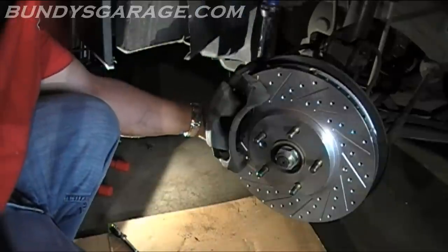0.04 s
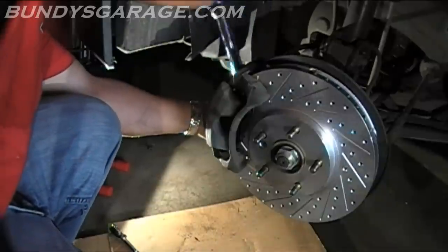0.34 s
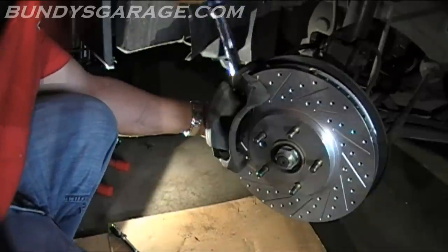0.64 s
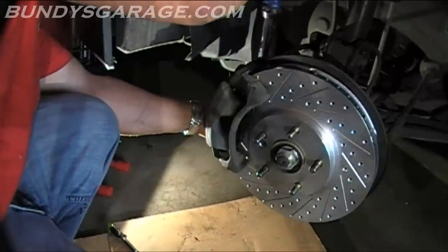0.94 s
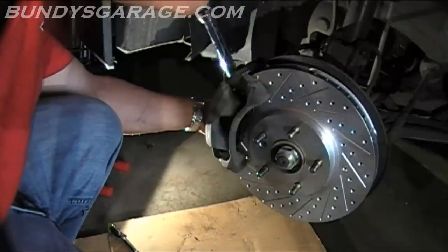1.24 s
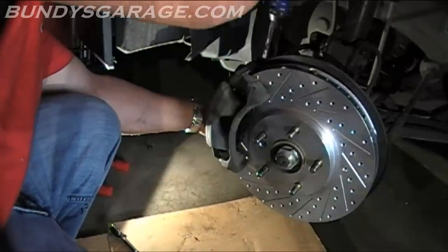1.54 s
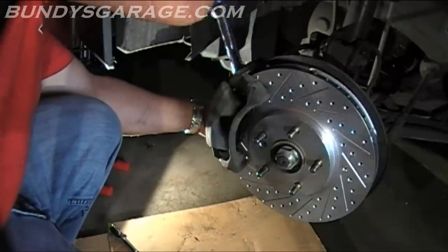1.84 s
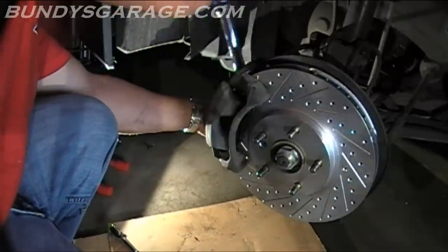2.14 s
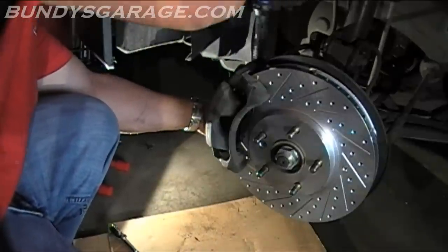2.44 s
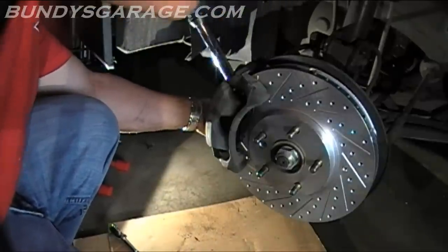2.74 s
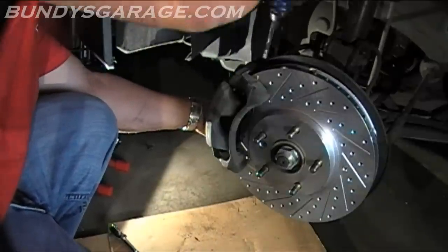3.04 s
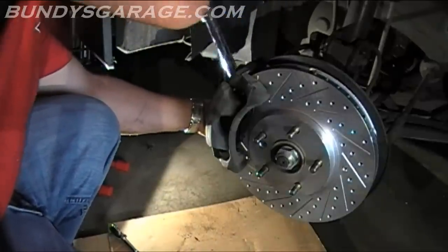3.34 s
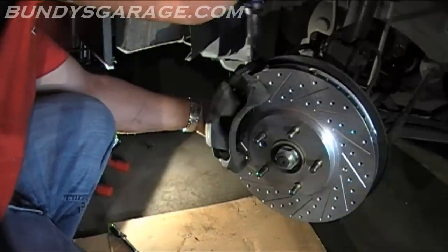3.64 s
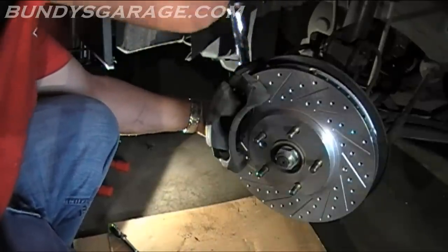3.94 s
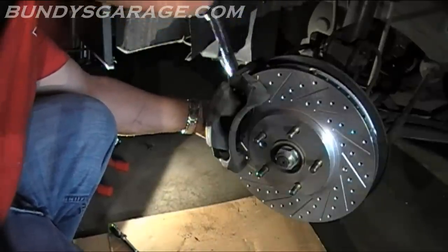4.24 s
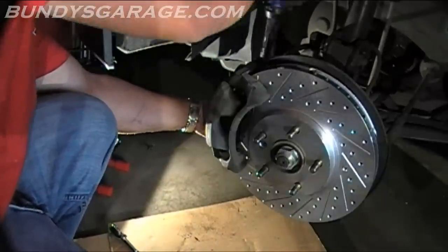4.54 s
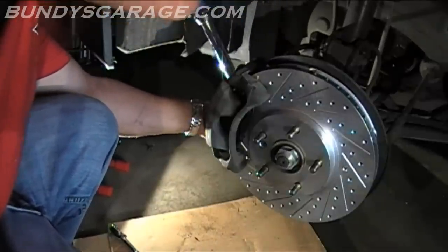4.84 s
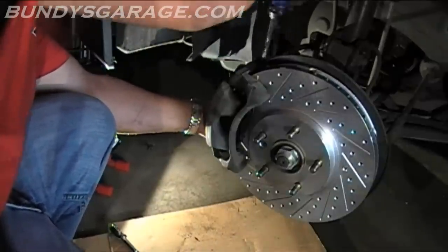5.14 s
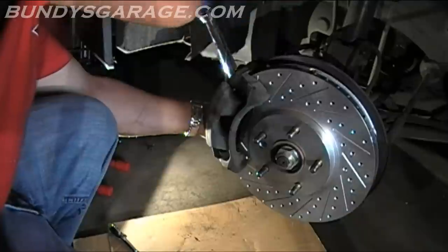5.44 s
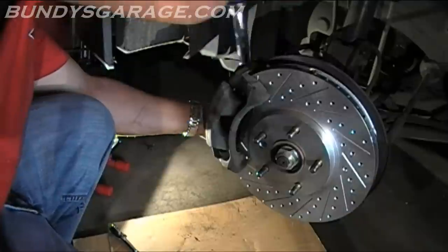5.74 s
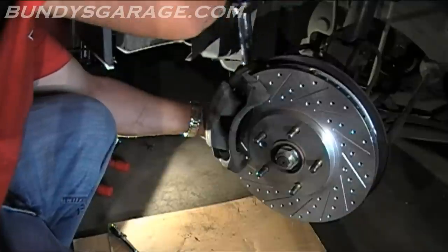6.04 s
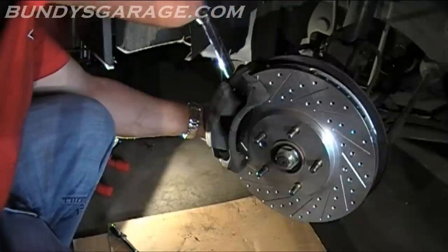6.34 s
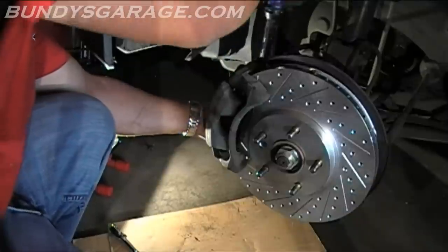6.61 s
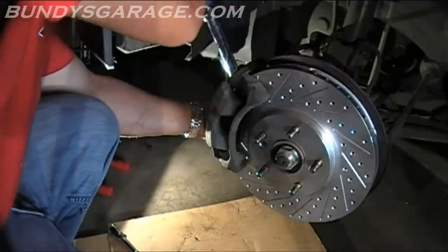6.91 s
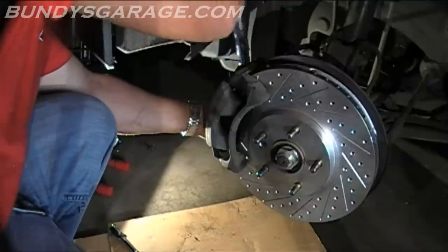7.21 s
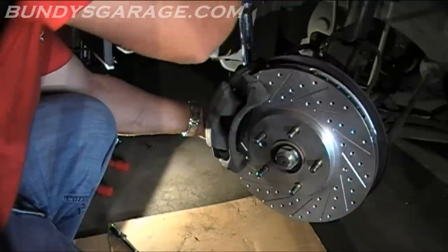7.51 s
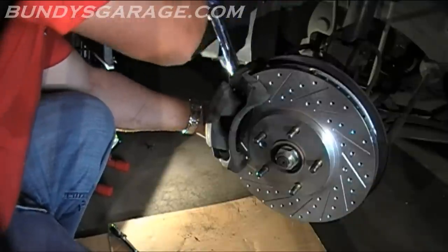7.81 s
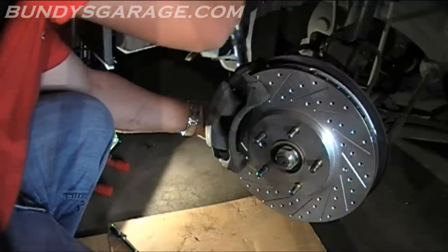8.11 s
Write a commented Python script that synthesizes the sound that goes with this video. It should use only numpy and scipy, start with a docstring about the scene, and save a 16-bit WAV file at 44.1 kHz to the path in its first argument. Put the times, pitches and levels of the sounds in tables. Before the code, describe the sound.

Close, short runs of ratchet clicks alternate with metallic knocks and hard clunks as a wrench tightens a brake bolt.

```python
"""A click-type torque wrench tightens a brake caliper bolt in a garage, close to a camera.
On each back swing the pawl skips a few teeth, then the head knocks as it takes up its slack.
From about 2 s the steel creeps under load and the wrench breaks over with clunks that ring the hub.
Near 3 s the bolt seats and the ticks grow fuller; after 7 s two tinks sound as the grip is reset.
Light taps and sleeve brushes come in between, over room air and the camera's faint whine."""
import sys
import numpy as np
from scipy import signal
from scipy.fft import rfft, irfft
from scipy.io import wavfile
from scipy.ndimage import uniform_filter1d

SR = 44100
rng = np.random.default_rng(int(sys.argv[2]) if len(sys.argv) > 2 else 0)


def pcm_store(signal):
    """Save signal as 16-bit PCM."""
    levels = np.round(np.clip(np.atleast_2d(signal), -1, 1) * 32767)
    wavfile.write(sys.argv[1], SR, levels.astype(np.int16).T)


N = 360297

# Socket resonances. Each row: frequency in Hz, width in Hz, lift in dB.
SOCKET_RESONANCES = [(345.3, 25, 7), (388.4, 15, 5.7), (761.5, 34, 14), (879, 28, 11), (1064, 21, 7),
                     (1137, 30, 7), (1275, 50, 2.2), (1300, 140, 3.2), (1860, 70, 2.1), (1790, 24, 2.5),
                     (2674, 25, 5.4), (2508, 31, 5.2), (3240, 380, 4), (3550, 29, 4.7), (4460, 28, 2),
                     (5460, 100, 11), (5730, 66, 5.4), (8000, 120, 6.3), (9100, 110, 4.6)]
# Spectrum of taps and creep. Each row: frequency in Hz, gain in dB.
CONTACT_SPECTRUM = [(150, -15.5), (400, 1), (800, -5.5), (1600, -2), (3500, -8), (6000, -9), (9000, -9.5),
                    (12000, -25.5), (16000, -38)]


def clunks():
    """The wrench breaks over under full load and snaps back, ringing the hub."""
    # Each row: start in seconds, level, bass, middle and treble in dB, T60 in seconds, pitch in Hz.
    events = [(2.0677, 10.5, -13, -2, 3.5, 0.066, 790), (2.0798, 16, -1, 4, -4, 0.056, 330),
              (2.154, 0.4, -1.5, 5.5, 4.5, 0.034, 740), (2.7925, 25.5, -9, 5.5, -5.5, 0.038, 646),
              (4.9633, 2.4, -1, 1, 1, .033, 427), (5.6003, 23.5, -6.5, 0, -3.5, 0.042, 406),
              (5.6095, 1.5, -0.5, 20.5, -23, .042, 1530), (5.6957, 6.5, -8, 0, 3, 0.035, 1500)]
    # Each row: frequency in Hz, gain in dB.
    spectrum = [(25, -45.5), (50, -40), (140, -18.5), (270, -14), (350, -6.5), (520, 6.5), (750, 3.5),
                (1100, -2.5), (1500, -5.5), (2400, -10.5), (3700, -6), (5200, -17), (8500, -15.5),
                (12500, -34), (16000, -46)]
    # Each row: resonance in Hz, width in Hz, lift in dB.
    hub = [(150, 16, 21), (202, 16, 14), (328, 34, 16), (447, 30, 8.9), (465, 24, 8.4), (567.4, 42, 11),
           (742, 38.2, 7.8), (780, 8.7, 2.2), (824, 43, 6.8), (1310, 55, 4.7), (1450, 110, 6.4),
           (1640, 35, 8.3), (2054, 48, 3.4), (2750, 60, 6), (3000, 91, 7), (3470, 110, 5.1), (3860, 190, 8)]
    rows = [(s, db, t60_s, hz, contact_curve(s, bass_db, middle_db, treble_db, hz, 150, lift_db=5.5))
            for s, db, bass_db, middle_db, treble_db, t60_s, hz in events]
    return blows(rows, spectrum, hub, rise_s=.00043, scatter_db=-1, scatter_t60_s=.12, ring_db=-15)


def knocks(soft_bass_db=7.5, bass_db_per_db=-.35, middle_db=-.65):
    """Head and socket take up their slack; a harder knock is a shorter contact with less bass."""
    # Each row: start in seconds, level in dB, treble in dB, T60 in seconds, pitch in Hz.
    events = [(1.654, 10.5, 1, 0.024, 538), (2.4176, 9, 10, 0.014, 5810), (3.1426, 16, 5.5, 0.057, 4370),
              (3.8357, 15.5, -1, 0.017, 3450), (4.554, 13, .5, 0.021, 3300), (5.2679, 14.5, 5, 0.053, 1305),
              (5.9545, 20, 7, 0.029, 353), (6.835, -2, 2, 0.014, 288), (7.465, 13.5, 3, 0.019, 2570),
              (7.5979, 3, 6, 0.016, 357)]
    # Each row: frequency in Hz, gain in dB.
    spectrum = [(90, -35.5), (220, -24.5), (350, -11), (550, -13), (800, -8.5), (1050, -3), (1350, -0.5),
                (2200, -7), (3500, -5), (5200, -10.5), (6600, -15.5), (8500, -6.5), (11000, -22.5),
                (16000, -50)]
    rows = []
    for s, db, treble_db, t60_s, hz in events:
        bass_db = soft_bass_db + bass_db_per_db * db
        contact = contact_curve(s, bass_db, middle_db, treble_db, hz, width_hz=.17 * hz, lift_db=2.5)
        rows.append((s, db, t60_s, hz, contact))
    return blows(rows, spectrum, SOCKET_RESONANCES,
                 rise_s=.0006, scatter_db=-6, scatter_t60_s=.088, ring_db=-12)


def pawl(t60_s=.023, seated_bass_db=.5, loose_bass_db=-9.5, treble_db=1.2):
    """The pawl drops over ratchet teeth: bright ticks, thinner until the bolt seats."""
    # Each row: start in seconds, level in dB, middle in dB, pitch in Hz.
    events = [(0.0447, 2, -3.5, 4950), (0.1772, 1.5, -1, 10600), (.76, 3, 1, 1680), (0.8007, 1, -2, 1690),
              (0.8515, 2.5, -4, 1870), (0.9214, 1, -8.5, 3630), (1.5133, 3.5, -7, 3020),
              (1.578, 0.5, -4, 5600), (2.2825, .5, 2.5, 12200), (2.3357, 1.5, 2, 12400),
              (3.0138, -1, -0.5, 8200), (3.0623, -7.5, -1, 4040), (3.069, -1.5, -2, 8800),
              (3.7151, 2, -4, 7000), (3.7705, -3, 1.5, 7200), (3.8512, -3.5, -8, 9000),
              (4.4207, -2, -5.5, 2820), (4.4829, -1, -4, 4140), (5.1564, -3, -2.5, 3000),
              (5.205, -7.5, 2, 3740), (5.2133, -2, -1, 8000), (5.8518, 0, -6, 8960), (5.909, -3, -4, 7400),
              (5.9945, -3, 6, 8250), (6.5518, -0.5, -1, 5500), (6.6125, -2, 1.5, 7200),
              (7.359, 1, -6.5, 3660), (7.4274, 1, 1, 8860)]
    # Each row: frequency in Hz, gain in dB.
    spectrum = [(150, -29), (500, -10.5), (1000, -8), (1700, -2), (2400, -6), (3200, -1), (4000, -1.5),
                (5000, -4.5), (6500, -1.5), (8200, 3), (10000, -4.5), (12500, -13.5), (14500, -27),
                (16500, -31.5)]
    # Each row: resonance in Hz, width in Hz, lift in dB.
    ratchet = [(1850, 420, 6.5), (3020, 140, 8.5), (3776, 390, 9.5), (4985, 150, 11), (5670, 190, 9),
               (7350, 350, 3), (7830, 250, -10), (9300, 200, 10.5), (11940, 300, -11.5)]
    rows = []
    for s, db, middle_db, hz in events:
        bass_db = seated_bass_db + loose_bass_db * looseness(s)
        contact = contact_curve(s, bass_db, middle_db, treble_db, hz, width_hz=520, lift_db=5.5)
        rows.append((s, db, t60_s, hz, contact))
    return blows(rows, spectrum, ratchet, rise_s=.0016, scatter_db=-14, scatter_t60_s=.11, ring_db=-8)


def blows(rows, spectrum, body, rise_s, scatter_db, scatter_t60_s, ring_db, sing_db=9.5, sing_oct=.055):
    """Steel on steel: a crack through the struck body, scatter in the wheel well, ringing modes."""
    # Faint modes of disc and handle. Each row: frequency in Hz, level in dB, T60 in seconds.
    steel_modes = [(285, -25, 1.1), (352, -24.5, 1.9), (531.7, -19, 0.53), (669, -20.5, 0.28),
                   (811, -16.5, 0.2), (1206, -23, 0.17), (1395, -23.5, 0.2), (1493, -19.5, 0.2),
                   (1779, -21.5, 0.34), (2980, -19.5, 0.053), (3720, -23.5, .14), (4900, -24, .19),
                   (5720, -23, .23), (8590, -20.5, 0.079)]
    mode_hz, mode_db, mode_t60_s = np.transpose(steel_modes)
    cracks, ringing = np.zeros((2, 2, N))
    t, ring_t = np.arange(4096) / SR, np.arange(SR) / SR
    modes = unit(np.sin(2 * np.pi * mode_hz[:, None] * ring_t) * amp(-60 * ring_t / mode_t60_s[:, None]))
    attack = 1 - np.exp(-(t / rise_s) ** 2)
    for s, db, t60_s, pitch_hz, contact in rows:
        decay = amp(-60 * t / t60_s) + amp(scatter_db - 60 * t / scatter_t60_s)
        add(cracks, s - rise_s / 2, amp(db) * colour(clatter(attack * decay), spectrum, contact))
        # Modes near the blow's pitch sing out; each landing wakes them in other shares.
        tuned_db = sing_db * np.exp(-(np.log2(mode_hz / pitch_hz) / sing_oct) ** 2)
        drive_db = db + ring_db + value_at(spectrum, mode_hz) + value_at(contact, mode_hz)
        spread_db = 2.8 * rng.standard_normal((2, len(mode_hz)))
        shares = amp(drive_db + mode_db + tuned_db + spread_db)
        add(ringing, s, (shares * rng.choice([-1, 1], shares.shape)) @ modes)
    return colour(cracks, resonance_curve(body), size=8192)[:, :N] + ringing


def clatter(envelope, rattle_db=1, lump_samples=30, smooth_bins=61):
    """Dense modes as enveloped noise, lumpy where the faces chatter; mid and side."""
    n = len(envelope)
    lumps = uniform_filter1d(rng.standard_normal(n), lump_samples) * np.sqrt(lump_samples)
    bins = rfft(rng.standard_normal((2, n)) * envelope * amp(rattle_db * lumps), 8192)
    bins /= np.sqrt(uniform_filter1d(abs(bins) ** 2, smooth_bins, axis=1, mode="mirror"))  # fill gaps
    return unit(irfft(bins)[:, :n])


def contact_curve(s, bass_db, middle_db, treble_db, pitch_hz, width_hz, lift_db, loose_sheen_db=4.5):
    """How a blow lands, as (Hz, dB): a broad tone plus a hump at its pitch."""
    hz = np.fft.rfftfreq(4096, 1 / SR)
    top_db = treble_db + loose_sheen_db * looseness(s)
    tone = [(150, 0), (450, bass_db), (1400, middle_db), (3800, 0), (8500, treble_db), (12000, top_db)]
    hump_db = lift_db / (1 + (2 * (hz - pitch_hz) / width_hz) ** 2)
    return np.transpose([hz, value_at(tone, hz) + hump_db])


def resonance_curve(body, smooth_bins=161):
    """A body's resonances as (Hz, dB), level on average."""
    hz = np.fft.rfftfreq(8192, 1 / SR)
    power = 1 + sum((amp(db) ** 2 - 1) / (1 + (2 * (hz - f) / width) ** 2) for f, width, db in body)
    power = np.maximum(power, .1)
    return np.transpose([hz, 10 * np.log10(power / uniform_filter1d(power, smooth_bins))])


def looseness(s, seated_s=2.9, seating_s=.25):
    """1 while the bolt turns freely, 0 once seated."""
    return .5 - .5 * np.tanh((s - seated_s) / seating_s)


def taps(t60_s=.069, hz=1100, bass_db=3, middle_db=1):
    """A faint, dull knock dies away at the very start; light steel taps follow."""
    # Each row: start in seconds, level in dB, treble in dB.
    events = [(.007, -11, -8), (1.3823, -22, 9.5), (1.829, -17, 6), (2.535, -17.5, -8), (3.267, -7, -6),
              (3.5555, -16, -5.5), (3.9425, -8.5, -3), (4.7116, -15.5, 11.5), (4.738, -11, -27),
              (4.8984, -8.5, -7), (5.4177, -8, -22), (5.5584, -2.5, -5.5), (6.086, -11.5, -17.5),
              (6.799, -17, -5), (7.062, -9, -6.5), (7.1337, -14.5, -6), (7.181, -10, 0), (7.222, -20, -9),
              (7.279, -18, -20)]
    rows = [(s, db, t60_s, hz, contact_curve(s, bass_db, middle_db, treble_db, hz, 200, lift_db=3))
            for s, db, treble_db in events]
    return blows(rows, CONTACT_SPECTRUM, SOCKET_RESONANCES,
                 rise_s=.00091, scatter_db=-17.5, scatter_t60_s=.68, ring_db=-6.5)


def tinks(hz=1010, t60_s=.028):
    """A loose steel part touches and rings on one damped mode; mid only."""
    # Each row: start in seconds, peak in dB.
    events = [(7.222, -43), (7.279, -42)]
    out, t = np.zeros((2, N)), np.arange(SR // 4) / SR
    for s, db in events:
        ring = amp(db - 60 * t / t60_s) * np.sin(2 * np.pi * hz * t)
        add(out[:1], s, ring[None])
    return out


def creep():
    """Steel creeps under load before it lets go."""
    # Each row: start in seconds, length in seconds, level in dB.
    events = [(2.035, 0.034, -2), (4.902, 0.081, -2.5), (4.98, 0.061, -10), (5.405, 0.049, -13.5),
              (5.56, 0.14, 0.5), (5.594, 0.011, 0), (5.73, 0.047, -5.5), (5.937, 0.016, -8),
              (7.18, 0.06, -14.5), (8.13, 0.054, -20)]
    return friction(events, CONTACT_SPECTRUM, grain_db=3.5, taper=.3)


def sleeve():
    """A sleeve brushes past as the arm swings."""
    # Each row: start in seconds, length in seconds, level in dB.
    events = [(.33, 0.23, -9.5), (1.05, 0.12, -8), (4.67, 0.057, -11), (5.02, 0.16, -7), (6.31, 0.184, -17),
              (7.07, 0.55, -5), (7.82, 0.084, -21)]
    # Each row: frequency in Hz, gain in dB.
    spectrum = [(300, -29), (2000, -14), (6000, -18), (10000, -16.5), (12500, -29), (16000, -41)]
    return friction(events, spectrum, grain_db=13, taper=.11)


def friction(events, spectrum, grain_db, taper):
    """Dense runs of tiny slips of uneven size."""
    out = np.zeros((2, N))
    slips = rng.standard_normal((2, N)) * amp(grain_db * np.minimum(rng.exponential(1, N), 4))
    for s, length_s, db in events:
        run = slips[:, round(s * SR):][:, :round(length_s * SR)]
        run = unit(run * signal.windows.tukey(run.shape[1], taper))
        add(out, s, amp(db) * colour(run, spectrum))
    return out


def garage(x, side_db=5.5, build_s=.0081):
    """Dense reflections build up and die band by band; mid and side."""
    # Each row: frequency in Hz, T60 in seconds.
    decay_times = [(120, 0.62), (230, 0.4), (330, 0.3), (480, 0.21), (800, 0.31), (1500, 0.32),
                   (3500, 0.23), (8000, 0.25), (15000, 0.22)]
    # Each row: frequency in Hz, gain in dB.
    spectrum = [(120, -11), (230, 2), (330, -2), (480, -7.5), (800, -8.5), (1500, -12.5), (3500, -10),
                (8000, -21), (15000, -25)]
    hz, t, bands = signal.stft(rng.standard_normal((2, SR)), SR, nperseg=256)
    fade = amp(-60 * t / value_at(decay_times, hz)[:, None])
    tail = signal.istft(bands * unit(fade), SR, nperseg=256)[1][:, :SR]
    onset = 1 - np.exp(-(np.arange(SR) / SR / build_s) ** 2)
    response = colour(unit(tail * onset), spectrum)
    return signal.fftconvolve(x[:1], response, axes=1)[:, :N] * amp([[0], [side_db]])


def air_and_whine(air_db=-62.5):
    """Still garage air and the camera's steady tones; mid and side."""
    # Each row: frequency in Hz, gain in dB.
    air_spectrum = [(15, -72), (25, -34), (87, -6.5), (238, -3), (273, 2), (304, -8.5), (339, 2.5),
                    (410, -1), (1060, -2.5), (1640, -7.5), (3910, -15), (4990, -18), (8600, -19),
                    (15200, -33.5), (16500, -31)]
    # Each row: frequency in Hz, side against mid in dB.
    air_width = [(60, -8), (110, -2), (200, 0.5), (380, 2.5), (700, 4), (1290, 3), (2380, 3), (4400, 0.5),
                 (8120, -2.5), (15000, 2)]
    # Each row: frequency in Hz, RMS level in dB.
    tones = [(1082, -76), (3822, -86), (15735, -94.5)]
    air = amp(air_db) * np.sqrt(N) * unit(colour(rng.standard_normal((2, N)), air_spectrum)[:, :N])
    t = np.arange(N) / SR
    whine = sum(np.sqrt(2) * amp(db) * np.sin(2 * np.pi * (hz * t + rng.random())) for hz, db in tones)
    return np.array([air[0] + whine, colour(air[1:], air_width)[0, :N]])


def amp(db):
    """Decibels to gain."""
    return 10 ** (np.asarray(db) / 20)


def value_at(curve, hz):
    """Interpolates on a log frequency axis."""
    f, value = np.transpose(curve)
    return np.interp(np.log(hz + 1), np.log(f + 1), value)


def unit(x):
    """Scales each channel to energy 1."""
    return x / np.sqrt(np.sum(x ** 2, -1, keepdims=True) + 1e-20)


def add(mix, start_s, sound):
    """Mixes a sound in place."""
    part = mix[:, max(round(start_s * SR), 0):][:, :sound.shape[1]]
    part += sound[:, :part.shape[1]]


def colour(x, *curves, size=4096):
    """Minimum-phase filter from summed (Hz, dB) curves."""
    hz = abs(np.fft.fftfreq(size, 1 / SR))
    log_gain = np.log(amp(sum(value_at(curve, hz) for curve in curves)))
    impulse = np.fft.ifft(np.exp(np.conj(signal.hilbert(log_gain)))).real[:size // 2]
    return signal.fftconvolve(x, impulse[None], axes=1)


def scene():
    """Wrench and garage at a close microphone pair; left and right."""
    # Each row: frequency in Hz, side against mid in dB.
    width = [(100, -21), (300, -17), (600, -17), (2000, -16), (4000, -15), (8000, -9), (12000, -1.5)]
    # Each row: frequency in Hz, left against right in dB.
    balance = [(60, -3), (130, -3), (280, -1), (1000, -1), (2000, .6), (4000, -.3), (8500, 0), (13000, 4)]
    wrench = pawl() + knocks() + clunks() + taps() + tinks() + creep() + sleeve()
    in_room = wrench + garage(wrench)
    mid, side = np.array([in_room[0], colour(in_room[1:], width)[0, :N]]) + air_and_whine()
    lean = amp(value_at(balance, np.fft.rfftfreq(N, 1 / SR)) / 2)
    return irfft(rfft([mid + side, mid - side]) * [lean, 1 / lean], N)


def record(dry, low_cut_hz=70, ceiling=.8, high_cut_hz=16150):
    """Camera input: bass cut, rounded peaks, band limit."""
    thin = signal.sosfilt(signal.butter(2, low_cut_hz, "high", fs=SR, output="sos"), dry)
    rounded = thin / (1 + (thin / ceiling) ** 4) ** .25
    lowpass = signal.firwin(255, high_cut_hz, window=("kaiser", 8), fs=SR)
    return signal.oaconvolve(rounded, lowpass[None], "same")


dry = scene()
out = record(dry)
pcm_store(out)
```